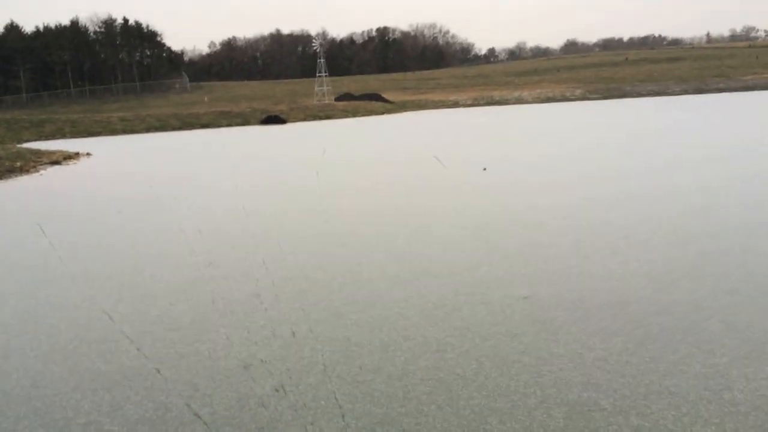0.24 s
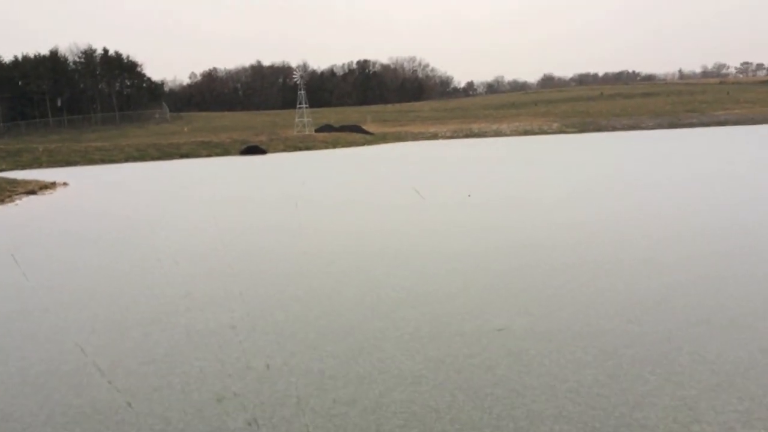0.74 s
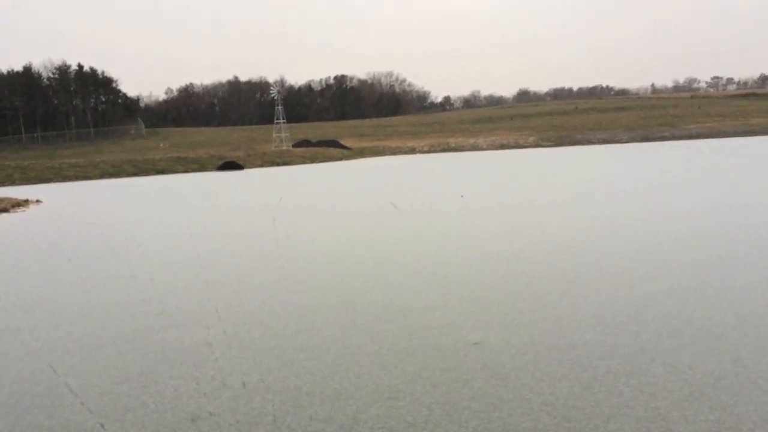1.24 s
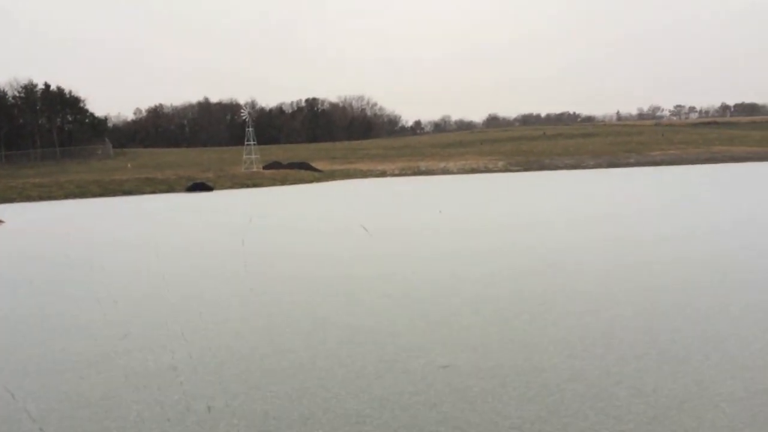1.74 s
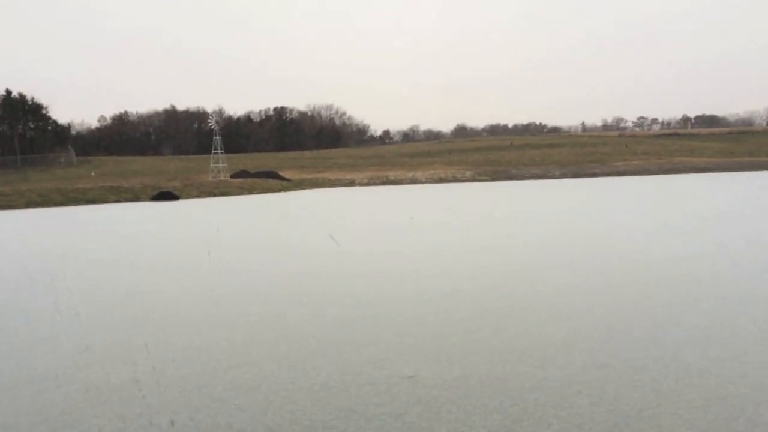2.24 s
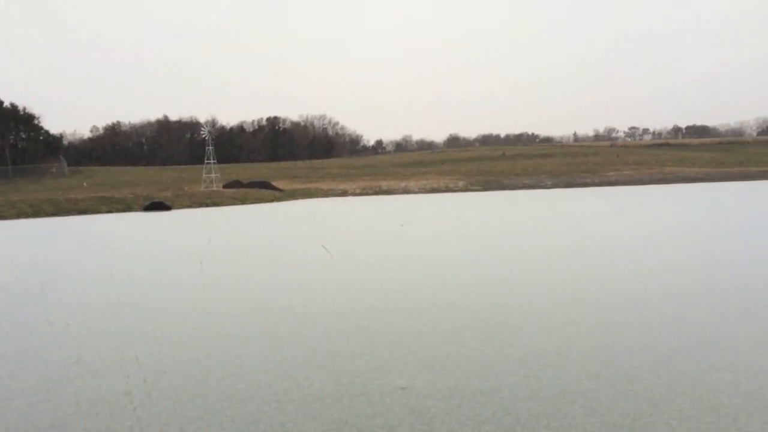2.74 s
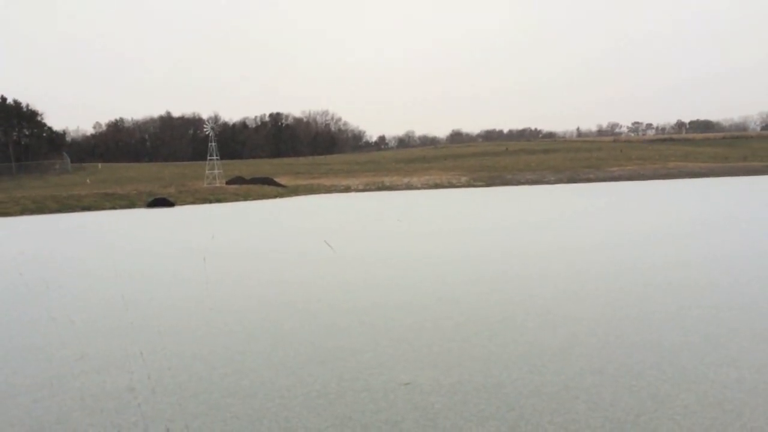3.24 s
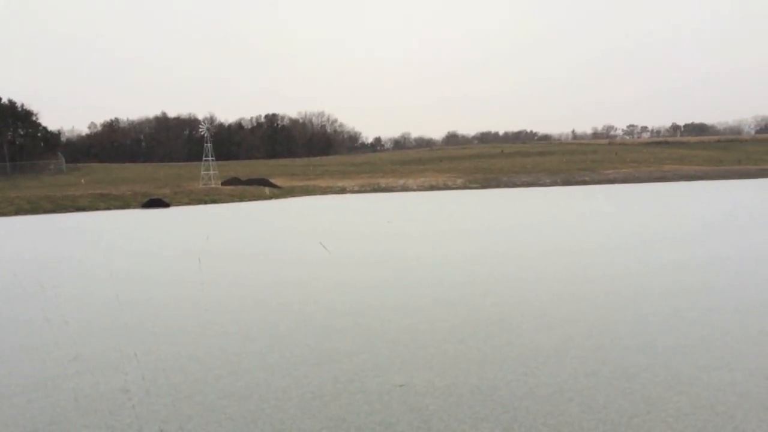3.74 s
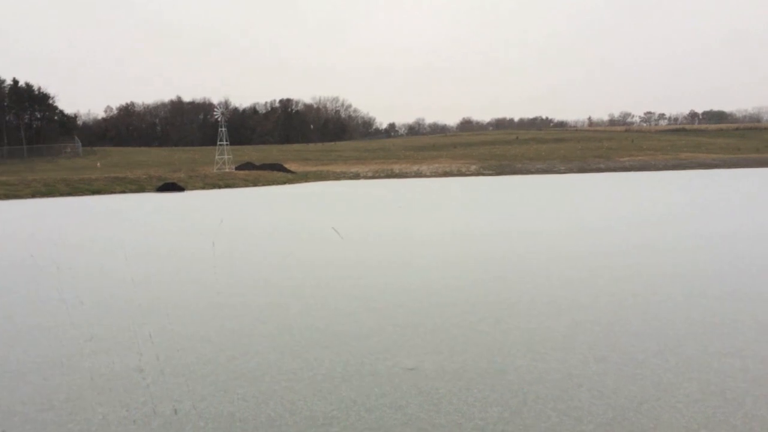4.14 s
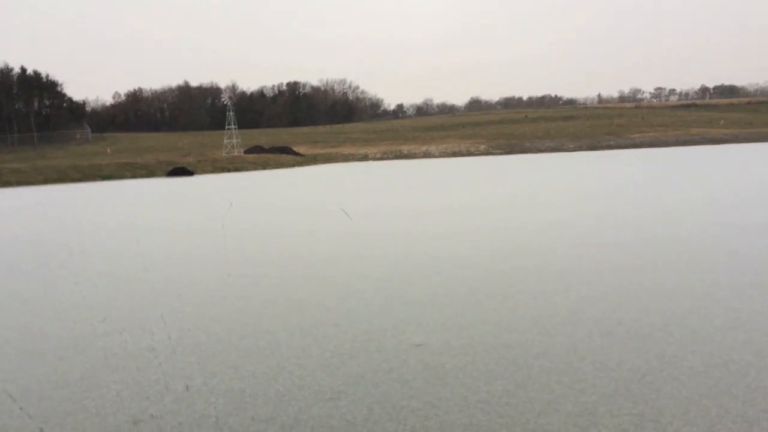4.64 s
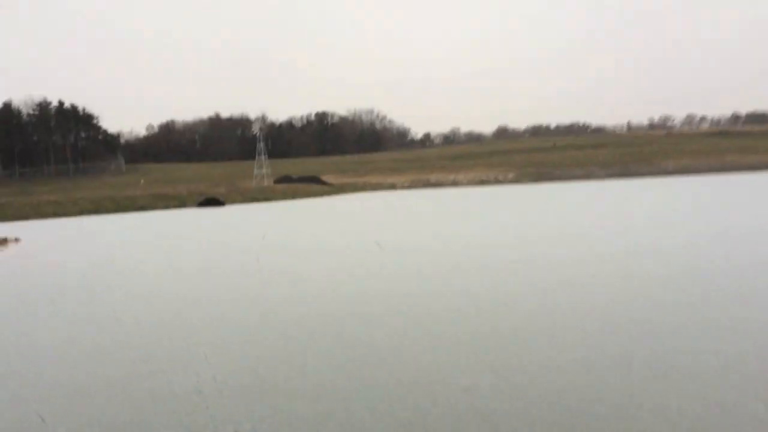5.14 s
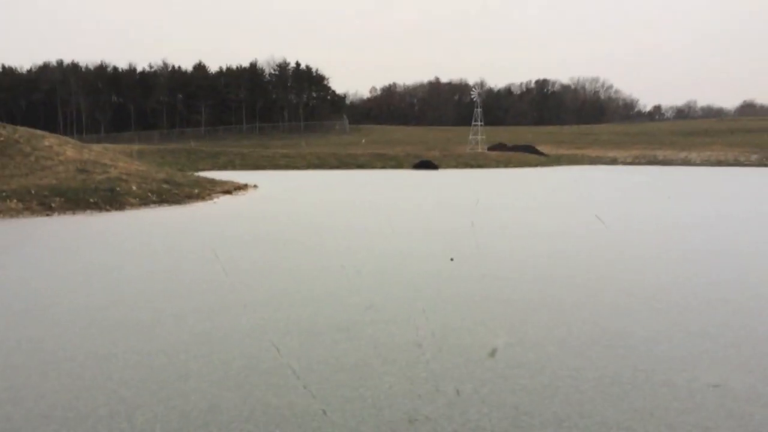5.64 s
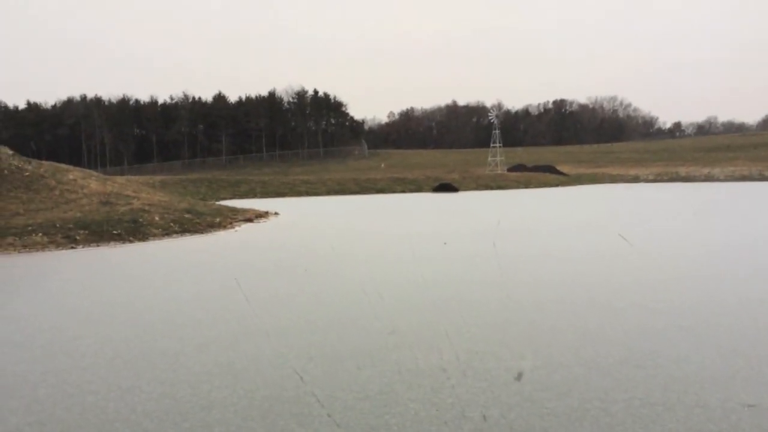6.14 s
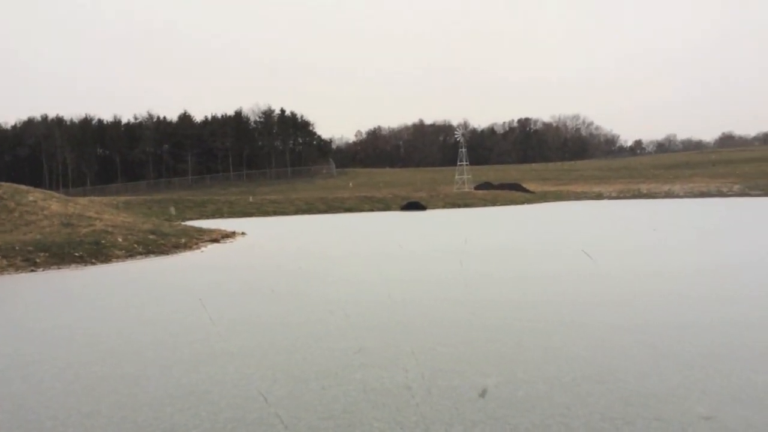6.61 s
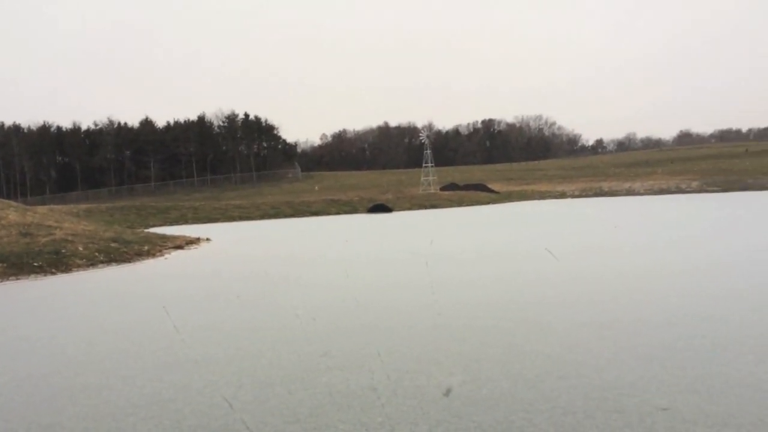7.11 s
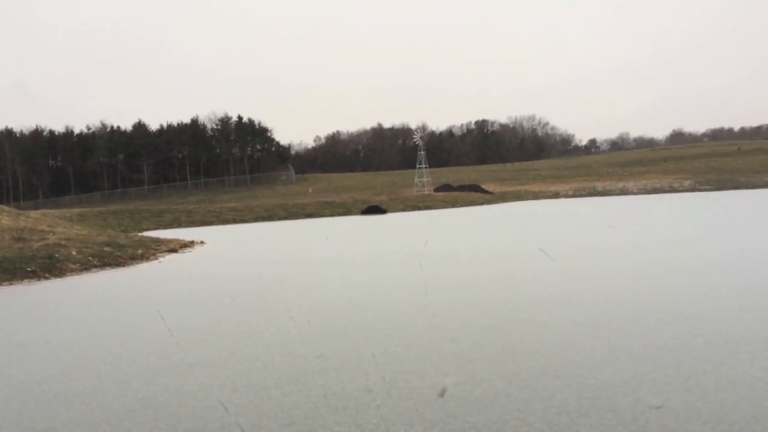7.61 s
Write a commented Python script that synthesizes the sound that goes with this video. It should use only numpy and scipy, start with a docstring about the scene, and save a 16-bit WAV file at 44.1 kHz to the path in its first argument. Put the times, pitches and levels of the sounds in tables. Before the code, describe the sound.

Two stones thrown in turn skip across a thinly frozen pond, each bounce chirping a falling, laser-like pew that echoes off the ice and shore.

```python
"""Two stones are thrown over a thinly frozen pond and skip away, each bounce singing a falling 'pew'.
The ice carries bending waves, treble fastest, and radiates them down to the pitch at which they match
the speed of sound; that note holds until the click, a burst of noise, arrives through the air.
Splintered noise echoes and gliding tones answer from the ice and the shore. A jacket of coloured noise
rustles and ticks, most with the second throw, over a faint noise breeze with puffs on the microphone."""
import sys
import numpy as np
from scipy import signal
from scipy.fft import rfft, irfft, next_fast_len
from scipy.io import wavfile
from scipy.ndimage import uniform_filter1d, map_coordinates

SR = 44100
rng = np.random.default_rng(int(sys.argv[2]) if len(sys.argv) > 2 else 0)


def to_wav(s):
    """Save 16-bit WAV."""
    ch = np.atleast_2d(s).T  # columns
    pcm = np.round(np.clip(ch, -1, 1) * 32767)  # PCM
    wavfile.write(sys.argv[1], SR, pcm.astype(np.int16))


N = 347067  # length in samples
SOUND_SPEED = 343  # in air, m/s
TOP_HZ = 15600  # nothing sounds above this

# Stone on ice, often one edge just after the other. Each row: time the click is heard in seconds,
# note level in dB, hardness in dB per octave, click level in dB before its trim, click tilt in dB per octave.
BOUNCE_HITS = [(-0.072, -32.5, 3, -32, 0), (0.5936, -28, -6.5, -36, 2), (0.8194, -21, 2, -28, -14),
               (1.1505, -35, -1.5, -60, 0), (1.153, -37.5, 1, -45, 4), (1.343, -40, -1.5, -54, 0),
               (1.3586, -44, 0, -46, -4), (1.7134, -33, -8.5, -49, 0), (2.003, -38.5, -9, -58, 0),
               (2.009, -39, -5.5, -65, 0), (2.0165, -31.5, -3.5, -42, -8), (2.3767, -33, -7, -53, 0),
               (2.3821, -36, -6.5, -44, 3), (2.5816, -52, -6, -60, 0), (2.593, -53, -5, -58, 0),
               (2.793, -31, -5.5, -49, -6), (2.8588, -41.5, -8, -60, -2), (3.004, -47, -3, -58, 0),
               (3.089, -56, -9, -61, 0), (3.139, -56.5, -10, -65, 0), (3.3075, -42.5, -1, -44, -5),
               (3.3534, -51, -2, -56, 0), (3.397, -44.5, 2, -47, -4), (3.406, -47, 2, -62, 0),
               (5.5718, -30, 12, -17, -3), (5.5737, -24.5, 11, -8, -4), (6.0671, -28, 4, -31, -3),
               (6.3576, -37.5, -2, -41, 10), (6.3637, -48, 3, -47, 8), (6.5001, -56.5, 2.5, -44, 0),
               (6.506, -58, 3, -56, 0), (6.608, -57, -7, -60, -5), (6.616, -57, -2, -62, -5),
               (6.698, -59, -1.5, -59, 0), (6.8139, -67, 5, -44, 9), (7.119, -43, 2.5, -30, -13),
               (7.3015, -45.5, -7, -42, 6), (7.436, -55.5, -9, -55, 0), (7.451, -63, -2, -66, 0),
               (7.554, -51.5, -9, -66, 0), (7.561, -50, -5.5, -58, 0), (7.678, -71, 4, -68, 0),
               (7.724, -59, -12, -70, 0), (7.746, -55, -4.5, -65, 0), (7.868, -60.5, -3.5, -63, 0)]


def stones(click_trim_db=-2, lead_db=-14, lead_share=0.14, tilt_hz=6500, wet_slope=.1):
    """Each bounce: a faint tick and the sweep through the ice, the late click through the air, and echoes."""
    # Colour of stone on ice, through the air. Each row: frequency in Hz, relative level in dB.
    crack_colour = [(300, -12), (1500, -3), (3000, -1), (5200, 1.5), (8000, -11), (11000, -8), (15000, -12)]
    lead_colour = [(1500, -20), (4000, -6), (7000, 0), (11000, -5), (15000, -8)]  # Hz, relative dB
    out = np.zeros(N)
    for s, note_db, hardness, click_db, tilt in BOUNCE_HITS:
        hit = np.zeros(SR // 6)
        metres = distance(s)
        flight = metres / SOUND_SPEED
        add(hit, 0, amp(note_db) * pew(metres, hardness))
        # the highest waves all travel at the ice's top speed and arrive together
        lead = snap(lead_colour, t60=0.0077)
        add(hit, lead_share * flight, amp((note_db + click_db) / 2 + lead_db) * lead)
        colour = [(hz, level + tilt * np.clip(np.log2(hz / tilt_hz), -.5, 1)) for hz, level in crack_colour]
        add(hit, flight, amp(click_db + click_trim_db) * snap(colour, t60=.0026))
        wet = (metres / 12) ** wet_slope  # a near bounce stands out more from its echo
        add(out, s - flight, hit)
        add(out, s - flight, wet * signal.fftconvolve(hit, surroundings()))
    return out


def pew(metres, hardness, note_hz=1230, flatten_hz_per_m=3, scatter_hz=8, knee=.455, contact_hz=6000,
        uneven_db=1.7, leak_db=-1.3, leak_db_per_m=.05):
    """The sweep from one bounce; its length grows with distance and it stops when the air wave arrives."""
    # How strongly the ice radiates as the sweep falls. Each row: frequency in Hz, relative level in dB.
    radiation = [(1220, 1), (1300, 2.5), (1500, 3.5), (1750, 2), (2100, -1.2), (2600, -3.5), (2950, -9),
                 (4500, -18), (6800, -30), (9000, -47), (15000, -53.5)]
    # Slow bending waves that only leak into the air. Each row: frequency in Hz, level in dB before its trim.
    leak = [(250, -49), (400, -31), (600, -16), (900, -8), (1150, -22), (1400, -48.5)]
    flight = metres / SOUND_SPEED
    t = np.arange(int(1.5 * flight * SR)) / SR
    u = np.maximum(t / flight, .08)  # time as a share of the flight through air
    # farther out the ice is thicker and sings lower
    note = note_hz - flatten_hz_per_m * metres + scatter_hz * rng.standard_normal()
    free = note * (knee / u) ** 2  # a bending wave's speed goes with the root of its frequency
    hz = (free ** 2.5 + note ** 2.5) ** (1 / 2.5)  # the fall bends smoothly into the note

    # a jagged stone touches more than once, which carves dips and peaks into the treble
    jagged = map_coordinates(rng.standard_normal(40), [hz / 450], mode="mirror")
    ripple_db = 4.5 * jagged * np.sqrt(1 - note / hz)
    hardness_db = hardness * np.log2(np.minimum(hz, contact_hz) / note)
    level_db = along(radiation, hz) + hardness_db + ripple_db + uneven_db * wobble(280, len(t))
    held = np.clip((flight - t) / 0.00047, 0, 1) * (hz < TOP_HZ)
    sweep = amp(level_db) * held * np.sin(2 * np.pi * np.cumsum(hz) / SR)

    # below the note the wave slides on down, barely heard
    slow_hz = note * (.52 / u) ** 2
    fade = np.clip((t[-1] - t) / (0.48 * flight), 0, 1)
    slow_gain = amp(along(leak, slow_hz) + leak_db + leak_db_per_m * metres) * fade
    return sweep + slow_gain * np.sin(2 * np.pi * np.cumsum(slow_hz) / SR)


def distance(s):
    """Metres to the stone thrown last before time s; it loses speed as it skips away."""
    # Each row: time it leaves the hand in seconds, distance where it would stop in metres,
    # slowing time in seconds.
    throws = [(-0.24, 29.5, 1.99), (5.38, 33.5, 1.78)]
    thrown, reach, slowing = throws[int(s > throws[1][0])]
    return reach * (1 - np.exp(-(s - thrown) / slowing))


def surroundings(close_db=-19, close_t60=0.061, bank_db=-19, bank_rise=0.017, bank_t60=.19,
                 ring_db=-20, ring_rise=.025, ring_t60=.3, far_db=-31, far_t60=1.2, grain_db=7):
    """A fresh echo: flaws in the ice splinter the sweep at once, the bank scatters it, the sheet rings on."""
    # Echo colour. Each row: frequency in Hz, gain in dB.
    bank_colour = [(200, -9), (700, -2.5), (1000, 3.5), (1200, 1), (1500, 2), (2200, 5.5), (3200, 4.5),
                   (6000, -0.5), (8500, -7), (14000, -10)]
    # Ring of the ice sheet. Each row: frequency in Hz, gain in dB.
    sheet_colour = [(200, -11.5), (450, -1), (700, 5.5), (950, -2), (1130, -3), (1270, -2), (1450, -4.5),
                    (2000, -16.5), (5000, -42.5)]
    t = np.arange(SR * 3 // 4) / SR
    lumps = amp(3 * wobble(300, len(t)) + 2.5 * wobble(30, len(t)))

    def tail(db, rise, t60):
        """Noise that swells and dies, times in seconds."""
        shape = (1 - np.exp(-t / rise)) ** 2 * amp(-60 * t / t60) * lumps
        # a few facets reflect strongly
        facets = unit(rng.standard_normal(len(t)) * amp(grain_db * rng.standard_normal(len(t))))
        return amp(db) * facets * shape / np.linalg.norm(shape)

    scatter = tail(close_db, .001, close_t60) + tail(bank_db, bank_rise, bank_t60)
    ring = tail(ring_db, ring_rise, ring_t60) + tail(far_db, ring_rise, far_t60)
    scattered = filtered(scatter, lambda hz: amp(along(bank_colour, hz)))
    return scattered + filtered(ring, lambda hz: amp(along(sheet_colour, hz)))


def returns(loss_db=6.3, near_m=3.4, blur=.7, groan_blur=.15):
    """The shores send each bounce back, weaker for each doubling of its distance; a low wave groans on."""
    # Ways back from the shores. Each row: delay after the click in seconds, length in seconds,
    # first Hz, last Hz, level in dB over the note.
    shore_paths = [(0.004, 0.034, 1620, 1340, -20), (0.015, 0.029, 3130, 2930, -27),
                   (0.024, 0.032, 1420, 1215, -11), (0.052, 0.043, 1350, 1215, -24),
                   (0.083, 0.145, 1330, 1185, -33.5), (0.206, 0.096, 743, 687, -43)]
    # One low, slow wave in the ice after the first landing. The row: start in seconds, length in seconds,
    # first Hz, last Hz, level in dB.
    groan = (0.0, 0.37, 305, 205, -64)
    out = np.zeros(N)
    for s, note_db, *_ in BOUNCE_HITS:
        sent_db = note_db - loss_db * np.log2(distance(s) / near_m)
        for delay, length, first_hz, last_hz, path_db in shore_paths:
            add(out, s + delay, amp(sent_db + path_db) * glide(length, first_hz, last_hz, blur))
    s, length, first_hz, last_hz, db = groan
    add(out, s, amp(db) * glide(length, first_hz, last_hz, groan_blur, bend=1.5))
    return out


def glide(length, first_hz, last_hz, blur, bend=2.1):
    """A returning wave of peak near 1: it swells and sinks in pitch; its many paths beat together."""
    u = np.linspace(0, 1, int(length * SR))
    hz = last_hz + (first_hz - last_hz) * (1 - u) ** bend
    paths = 1 + blur * (wobble(first_hz / 5, len(u)) + 1j * wobble(first_hz / 5, len(u)))
    turns = rng.random() + np.cumsum(hz) / SR
    return np.sin(np.pi * u) * np.real(paths * np.exp(2j * np.pi * turns))


def jacket(swish_trim_db=1, crinkle_db=3.8, tick_trim_db=-1.5):
    """The sleeve swings back and whips forward as crinkling noise; small hard parts tick."""
    # Rustle of the cloth. Each row: frequency in Hz, relative level in dB per Hz.
    cloth_colour = [(180, -37), (300, -1.5), (550, -5.5), (1040, -5), (1440, -10), (1760, -6.5),
                    (2730, -16), (3330, -15.5), (15000, -36)]
    # The sleeve moves. Each row: fastest moment in seconds, swish level in dB before its trim,
    # rise in dB per second, fall in dB per second.
    swings = [(0.0, -64.5, 100, 65), (4.82, -60.5, 75, 125), (5.3, -55, 68, 72), (5.277, -42.5, 260, 450),
              (5.34, -48, 600, 380)]
    # Small hard ticks of clothing. Each row: start in seconds, peak in dB before its trim.
    ticks = [(0.0408, -37), (0.0772, -39), (0.0904, -49), (0.3501, -56), (0.3661, -49), (5.0943, -45),
             (5.1387, -27), (5.1741, -32), (5.2345, -30), (5.3667, -32), (5.4024, -39), (5.4116, -34)]
    # Colour of those ticks. Each row: frequency in Hz, relative level in dB per Hz.
    tick_colour = [(880, -44), (1500, -19.5), (3120, -1.5), (5450, 1), (8250, -2), (9630, -13), (13900, -6),
                   (15000, -7.5)]
    power = sum(swell(s, db + swish_trim_db, rise, fall) ** 2 for s, db, rise, fall in swings)
    crinkled = unit(noise(cloth_colour, N) * amp(crinkle_db * wobble(250, N)))
    out = np.sqrt(power) * crinkled
    for s, db in ticks:
        add(out, s, amp(db + tick_trim_db) * snap(tick_colour, t60=0.0055))
    return out


def air(hiss_db=-76, flutter_db=1.4, puff_rise_db_per_s=480, puff_fall_db_per_s=850):
    """A faint breeze over the fields, a fluttering rumble under steady hiss; puffs push on the microphone."""
    # Open country. Each row: frequency in Hz, relative level in dB per Hz.
    country_colour = [(15, -49.5), (25, -18), (56, -3), (115, 0.5), (233, -16.5), (297, -19), (378, -22.5),
                      (552, -26), (741, -29.5), (826, -31.5), (1410, -33), (1950, -36.5), (2770, -41),
                      (3720, -40.5), (15500, -46.5)]
    # Strength of the breeze. Each row: time in seconds, rumble level in dB.
    breeze = [(0.0, -66.5), (1.4, -66), (2.5, -63.5), (4.5, -65.5), (6.2, -68.5), (7.3, -67.5),
              (7.87, -63.5)]
    # Air pushing on the microphone. Each row: time of the peak in seconds, peak level in dB.
    puffs = [(0.008, -23.5), (5.145, -50), (5.186, -45), (5.266, -35), (5.331, -29.5), (5.548, -53),
             (5.788, -51), (5.846, -39), (5.921, -49)]
    # Colour of the puffs. Each row: frequency in Hz, relative level in dB per Hz.
    buffet_colour = [(20, -37), (40, -5), (65, 7), (90, 5), (130, -0.5), (200, -9), (320, -21.5),
                     (600, -34), (1300, -120)]
    rumble, hiss = split(noise(country_colour, N), edge_hz=494)
    strength_db = np.interp(np.arange(N) / SR, *np.transpose(breeze))
    bed = amp(strength_db + flutter_db * wobble(9.8, N)) * unit(rumble) + amp(hiss_db) * unit(hiss)
    push = sum(swell(s, db, puff_rise_db_per_s, puff_fall_db_per_s) for s, db in puffs)
    eddies = noise(buffet_colour, N)
    even = eddies / np.sqrt(np.abs(uniform_filter1d(eddies ** 2, size=900)))  # eddies of like strength
    return bed + push * even


def swell(s, db, rise, fall):
    """A gain that climbs to its peak at time s and sinks again, at steady rates in dB per second."""
    t = np.arange(N) / SR - s
    return amp(db - np.maximum(-rise * t, fall * t))


def snap(colour, t60):
    """A very short crack of peak 1: coloured noise that falls 60 dB in t60 seconds."""
    t = np.arange(SR // 50) / SR
    x = noise(colour, len(t)) * amp(-60 * t / t60)
    return x / np.abs(x).max()


def noise(colour, count):
    """Coloured noise of rms 1."""
    return unit(filtered(rng.standard_normal(count), lambda hz: amp(along(colour, hz))))


def wobble(rate, count):
    """A wandering random curve, rate knots a second."""
    knots = rng.standard_normal(4096)
    return np.interp(np.arange(count) * rate / SR, np.arange(len(knots)), knots)


def filtered(x, gain):
    """x times a gain that depends on frequency."""
    m = next_fast_len(len(x) + 2048)
    return irfft(rfft(x, m) * gain(np.fft.rfftfreq(m, 1 / SR)), m)[:len(x)]


def split(x, edge_hz):
    """The parts of x below and above an edge."""
    low = filtered(x, lambda hz: 1 / (1 + (hz / edge_hz) ** 4))
    return low, x - low


def along(points, hz):
    """(Hz, value) points read on a log axis."""
    f, v = np.transpose(points)
    return np.interp(np.log(hz + 1), np.log(f + 1), v)


def amp(db):
    """Decibels to gain."""
    return 10 ** (np.asarray(db) / 20)


def unit(x):
    """Scale to rms 1."""
    return x / np.sqrt(np.mean(x ** 2) + 1e-20)


def add(track, s, x):
    """Mix x into the track at time s, cutting what falls outside it."""
    start = round(s * SR)
    x = x[max(-start, 0):]
    part = track[max(start, 0):][:len(x)]
    part += x[:len(part)]


def scene():
    """Everything heard from the bank, in one channel."""
    return (stones() + returns() + jacket() + air())[None]


def record(dry):
    """A sharp band limit removes everything from TOP_HZ up."""
    return np.array([filtered(x, lambda hz: hz < TOP_HZ) for x in dry])


dry = scene()
out = record(dry)
to_wav(out)
```